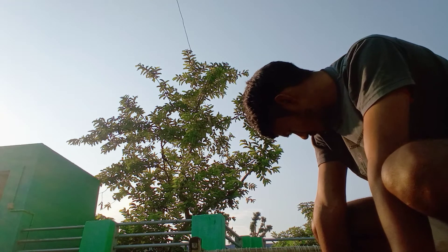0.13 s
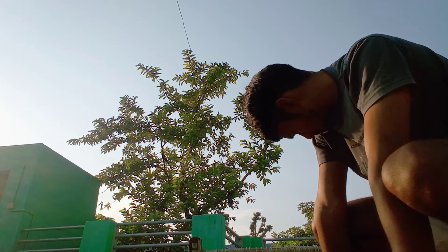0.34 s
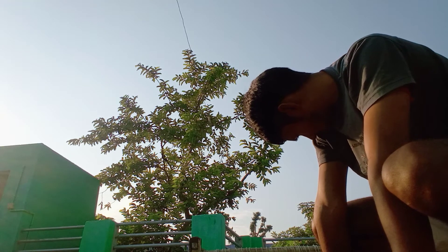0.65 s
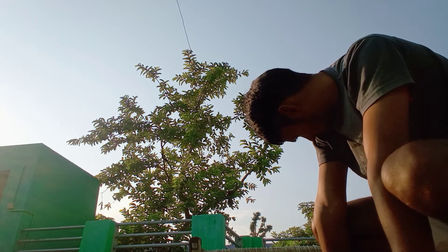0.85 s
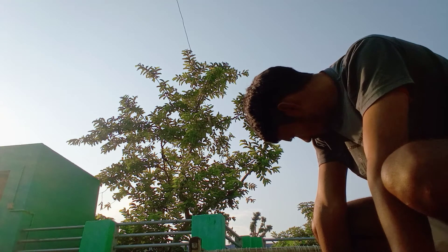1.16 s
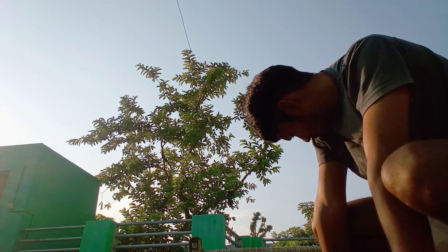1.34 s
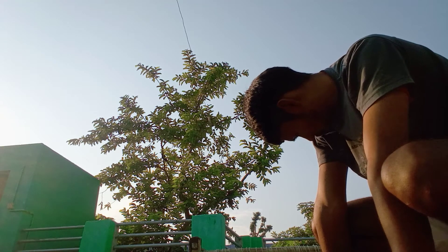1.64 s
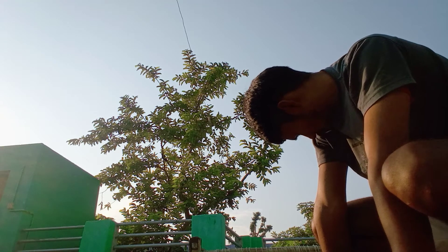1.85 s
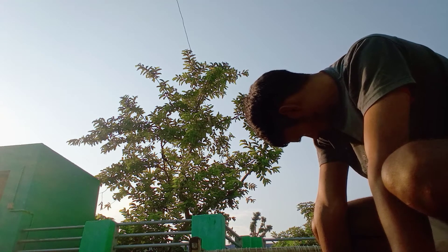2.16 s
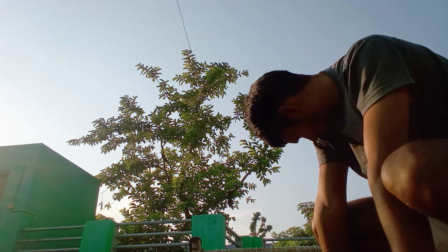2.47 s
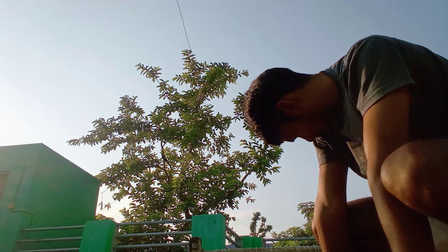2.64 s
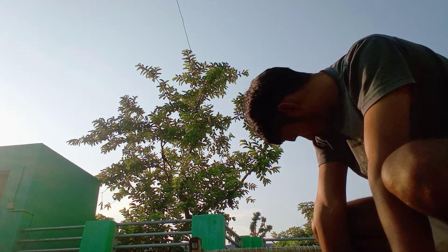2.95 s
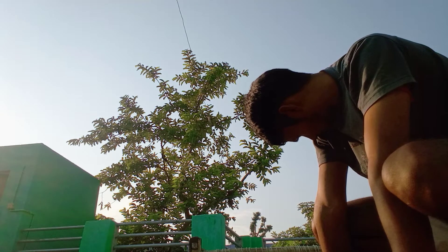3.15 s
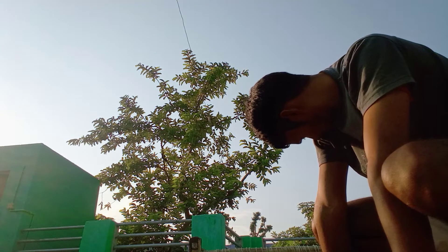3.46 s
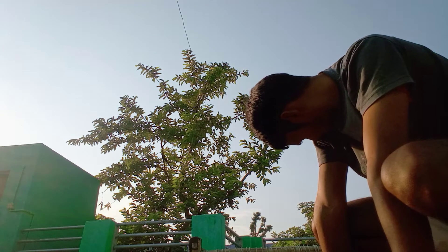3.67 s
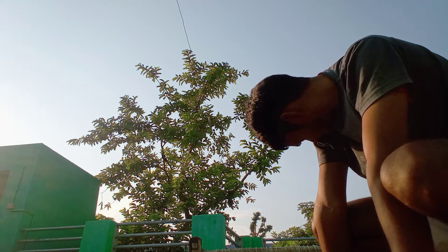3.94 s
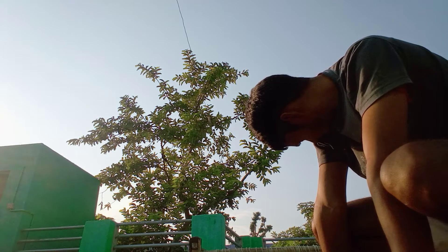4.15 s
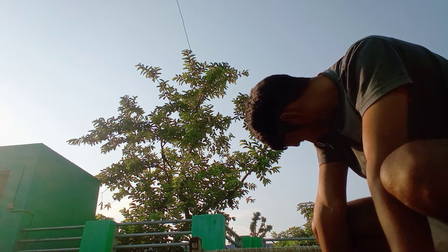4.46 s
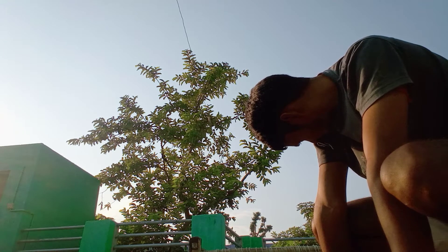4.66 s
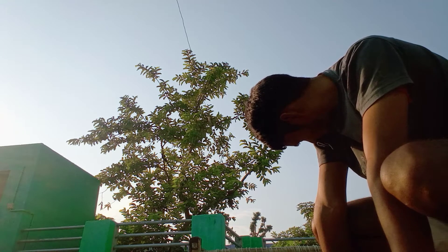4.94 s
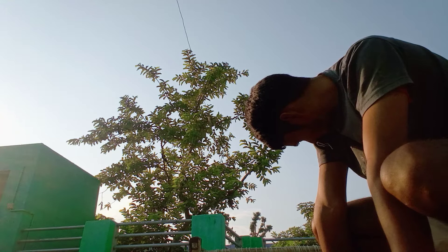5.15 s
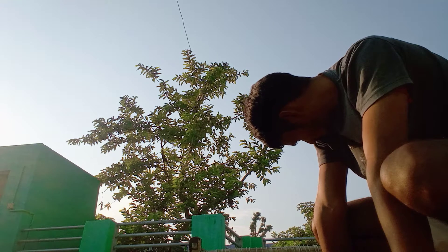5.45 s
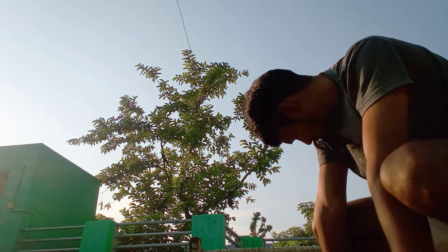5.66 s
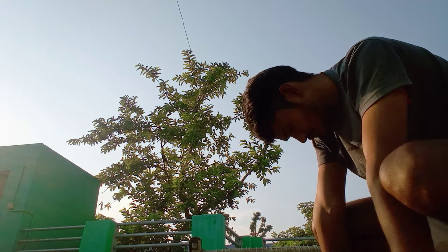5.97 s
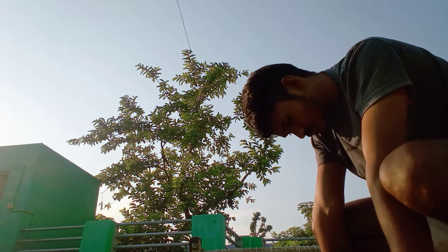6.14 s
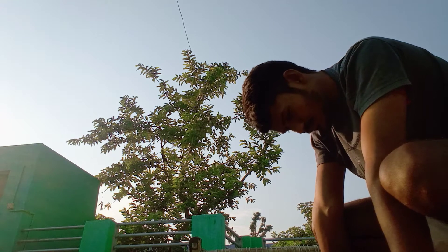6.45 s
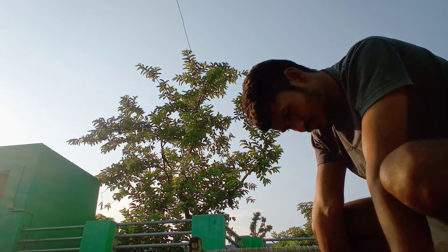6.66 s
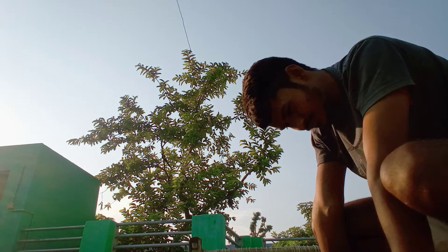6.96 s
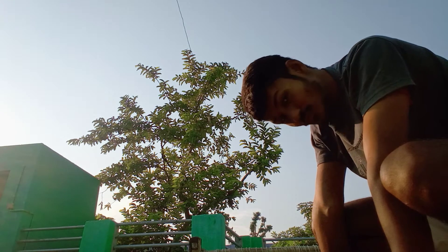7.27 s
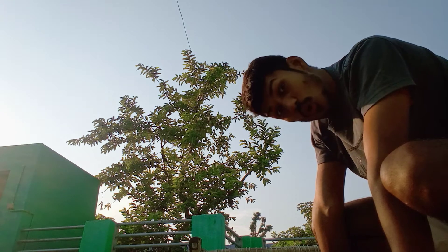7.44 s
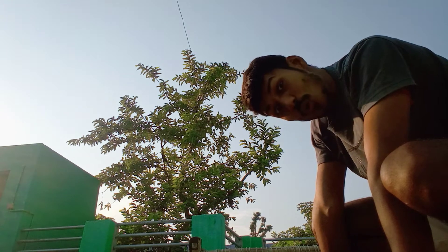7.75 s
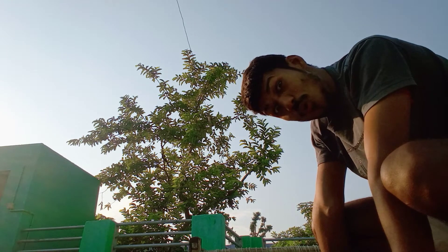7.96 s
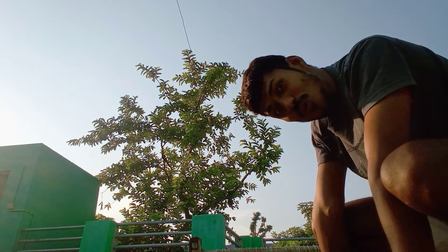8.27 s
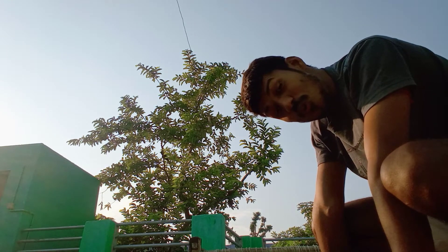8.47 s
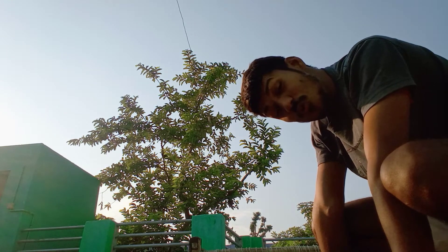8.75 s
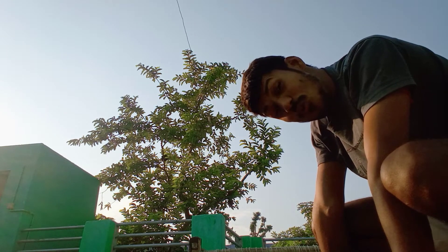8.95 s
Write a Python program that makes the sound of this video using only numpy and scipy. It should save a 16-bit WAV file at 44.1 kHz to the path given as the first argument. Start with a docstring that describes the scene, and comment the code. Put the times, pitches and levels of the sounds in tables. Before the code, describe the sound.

A nearby bird, a koel, calls in short runs of clear, loud whistles, each note higher than the last. Four runs sound across an open rooftop, ringing lightly off the walls and surrounding houses. In the gaps, faint chirps of distant small birds and a low rumble of town come through. A short, soft rustle of clothing close to the microphone follows the final call.

```python
"""On a roof terrace, a koel is heard from a nearby tree, in bursts of whistled notes that climb in pitch.
Its syrinx gives a nearly pure tone, with weak overtones filtered by throat and beak. Wall echoes
interfere with each note so that it beats as it glides, and the neighbourhood reverberates after it.
Small birds chatter and an insect trills far off over a faint town rumble; a hollow noise swells once.
Cloth rustles near the microphone, mostly at the end."""
import sys
import numpy as np
from scipy import signal
from scipy.fft import rfft, irfft, next_fast_len
from scipy.io import wavfile
from scipy.ndimage import uniform_filter1d

SR = 44100
rng = np.random.default_rng(int(sys.argv[2]) if len(sys.argv) > 2 else 0)


def persist_wave(psi):
    """Save psi, clipped to +-1, as 16-bit WAV."""
    counts = np.round(np.clip(psi, -1, 1) * 32767).astype(np.int16)
    wavfile.write(sys.argv[1], SR, np.atleast_2d(counts).T)


N = 401751
TIME = np.arange(N) / SR

# distant town rumble, plus a separate faint hiss near 8 kHz (frequency [Hz], relative density [dB])
BACKGROUND_SPECTRUM = [(25, -38.5), (45, -27), (62, -15), (86, -2), (125, -9.5), (165, -7.5), (205, -12.5),
                       (800, -22), (1200, -26), (3400, -30.5), (6600, -56.5), (8300, -49), (10500, -71),
                       (15500, -65.5)]
# slow course of the background (time [s], level [dB])
BACKGROUND_LEVELS = [(0, -51.5), (1.9, -51), (2.7, -52.5), (3.7, -51), (5.6, -51), (7.4, -52), (8.8, -54)]
# hollow distant noise (frequency [Hz], relative density [dB])
SWELL_SPECTRUM = [(150, -26), (400, -10), (520, 10), (620, -8), (760, 6), (1100, -18.5), (2200, -5),
                  (3200, -12.5), (4500, -63)]

# a far bird's thin falling whistles (time [s], relative level [dB])
FAR_WHISTLES = [(0.549, -68), (2.369, -54.5), (5.651, -55.5), (8.269, -52.5)]
WHISTLE_S, WHISTLE_HZ, WHISTLE_WIDTH_HZ = .17, (4300, 4100, 3860), 46
# slurs that climb at one speed to one pitch (time [s], length [s], relative level [dB])
FAR_SLURS = [(0.524, 0.16, -52), (0.924, 0.077, -59.5), (1.477, .29, -58.5), (2.31, .25, -57.5)]
SLUR_TOP_HZ, SLUR_HZ_PER_S, SLUR_WIDTH_HZ = 2540, 3100, 170
# scolding calls, an arched chip and then a drop (time [s], relative level [dB])
FAR_SCOLDS = [(2.165, -54.5), (4.982, -58.5), (5.38, -64), (6.32, -53)]
CHIP_S, CHIP_HZ, CHIP_WIDTH_HZ = .07, (3950, 4350, 3950), 700
DROP_AFTER_S, DROP_S, DROP_HZ, DROP_WIDTH_HZ, DROP_DB = 0.055, 0.16, (3580, 2540, 2207), 690, -3.5
# far pips and squawks, and one thin, high insect trill
# (time [s], length [s], pitch [Hz], bandwidth [Hz], relative level [dB])
FAR_STEADY_CALLS = [(0.672, 0.42, 4300, 600, -69), (0.968, 0.18, 3570, 400, -54),
                    (1.134, 0.157, 3110, 200, -58.5), (1.283, 0.31, 2990, 800, -57.5),
                    (1.723, 0.26, 3245, 1300, -53.5), (1.642, 0.17, 8300, 220, -73.5),
                    (2.572, 0.19, 2480, 200, -62), (3.079, .11, 2805, 130, -57.5),
                    (3.622, 0.13, 2750, 900, -53.5), (4.55, 0.53, 3260, 150, -67),
                    (6.867, 0.27, 741, 89.7, -60.5), (7.156, 0.059, 2520, 90, -57)]

# strokes of cloth (peak time [s], rise [s], fall [s], level [dB])
CLOTH_STROKES = [(5.60, 0.018, 0.11, -53), (8.692, 0.12, 0.062, -54.5), (8.814, 0.012, 0.022, -43),
                 (8.846, 0.009, 0.011, -34), (8.884, 0.0092, 0.056, -47.5), (8.98, 0.0026, 0.057, -45)]
# friction noise of cloth (frequency [Hz], relative density [dB])
CLOTH_SPECTRUM = [(120, -31.5), (250, -12), (470, -3), (640, -14.5), (850, -10.5), (1500, -15),
                  (1800, -15.5), (3200, -12), (6000, -33.5), (8200, -31.5), (11600, -43), (15500, -36.5)]

# reflections from the walls, parapets and floor of the terrace (delay [ms], gain [ratio])
REFLECTIONS = [(2.299, 0.158), (3.996, 0.234), (5.77, 0.352), (8.405, 1.35), (8.803, 0.27), (8.959, 0.904),
               (8.969, 0.201), (9.403, 0.326), (13.552, 0.345), (14.872, 0.147), (30.688, 0.194),
               (59.403, 0.216)]
# rough walls scatter the treble away (frequency [Hz], gain [dB])
WALL_RESPONSE = [(1700, -0.5), (2800, -7), (5000, -15), (15000, -17.5)]
# sound scattered by foliage (frequency [Hz], gain [dB])
LEAF_RESPONSE = [(1600, -30), (2400, -6), (6000, -2), (9000, 3)]
# reverberation of the neighbourhood (frequency [Hz], time to decay by 60 dB [s])
REVERB_TIMES = [(800, 0.7), (1400, 0.77), (3000, 0.15), (7000, 0.55), (14000, 0.087)]
# colour of the koel's reverberation (frequency [Hz], gain [dB])
REVERB_RESPONSE = [(1400, 2), (3000, 5.5), (7000, 5), (10000, 7), (14000, 3.0)]

# koel notes (crest time [s], dip pitch [Hz], crest pitch [Hz], fall length [s],
# relative lead-in level [dB], relative crest level [dB])
KOEL_NOTES = [(-0.047, 1085, 1315, .078, -27, -14.5), (0.1932, 1211, 1398, .075, -18, -12),
              (0.4386, 1262, 1438, .073, -13.5, -12), (3.6694, 788, 1186, .049, -43.5, -18.5),
              (3.8972, 1044, 1311, .06, -23, -14.5), (4.1389, 1172, 1374, .069, -18, -14),
              (5.8384, 794.6, 1239, .051, -36, -16.5), (6.0627, 1060, 1340, .063, -22.5, -12),
              (6.2946, 1204, 1401, .071, -14.5, -11.5), (6.54, 1261, 1441, .074, -14.5, -9.5),
              (6.7872, 1304, 1477, .066, -13, -10), (7.6969, 999, 1360, .058, -25, -12.5),
              (7.935, 1235, 1464, .077, -17, -10), (8.189, 1317, 1504, .074, -17, -14.5)]
# a note's turning points, from its crest (start [s], hump [s], dip [s], shoulder [s], shoulder [s])
TURNING_TIMES = (-.1101, -.0766, -.0469, -.0089, .019)
# shoulder pitch as a share of the crest's height (above the dip [ratio], above the end [ratio])
SHOULDER_HEIGHTS = (.941, .809)
# harmonics 2 to 12 at the syrinx (relative level [dB])
SYRINX_HARMONICS = [-38, -35.5, -36.5, -32, -43.5, -49, -52.5, -60.5, -61.5, -59, -59]
# resonances of throat and beak (frequency [Hz], gain [dB])
TRACT_RESPONSE = [(1700, 6.5), (2080, -4), (2380, -2), (2580, -9.5), (2830, 5), (3300, -0.5), (3800, -6.5),
                  (4250, -12.5), (4650, -15), (5450, 0.5), (6300, -5), (7300, -5), (11000, 2.5),
                  (12400, -14), (14000, 7.5)]
# breath noise (frequency [Hz], relative density [dB])
BREATH_SPECTRUM = [(900, -8.0), (2200, 0), (4500, -7), (6000, 5), (9000, -15), (15000, -6.5)]
# rasps as the voice catches at the start of a burst (time [s], bandwidth [Hz], relative level [dB])
BURST_RASPS = [(3.545, 447, -46), (5.715, 400, -45.5), (7.591, 91, -36.5)]
RASP_S, RASP_HZ = 0.15, (1018, 1077.5, 1150)


def from_db(db):
    """Amplitude ratio: tenfold for every 20 dB."""
    return 10 ** (np.asarray(db) / 20)


def unit(x):
    """Normalisation to an rms of 1."""
    return x / np.sqrt(np.mean(x ** 2) + 1e-20)


def value_at(points, hz):
    """Interpolation on a logarithmic frequency axis."""
    f, value = np.transpose(points)
    return np.interp(np.log(hz + 1), np.log(f + 1), value)


def colour(x, points):
    """Linear filtering: multiplies the spectrum by a response (frequency [Hz], gain [dB])."""
    size = next_fast_len(len(x) + 4096)
    response = from_db(value_at(points, np.fft.rfftfreq(size, 1 / SR)))
    return irfft(rfft(x, size) * response, size)[:len(x)]


def drift(count, hz):
    """Low-pass noise: a random wavering of rms near 1, up to about hz."""
    size = next_fast_len(count + SR // 4)
    f = np.fft.rfftfreq(size, 1 / SR)
    spectrum = rfft(rng.standard_normal(size)) / np.sqrt(1 + (f / hz) ** 6)
    return unit(irfft(spectrum, size))[:count]


def add(mix, s, sound):
    """Superposition of a sound on the mix at time s."""
    at = round(s * SR)
    sound = sound[max(-at, 0):]
    part = mix[max(at, 0):][:len(sound)]
    part += sound[:len(part)]


def glide(t, times, values):
    """Monotone cubic interpolation: a smooth curve that never overshoots its points."""
    times, values = np.array(times), np.array(values, float)
    gap = np.diff(times)
    slope = np.diff(values) / gap
    a, b = 2 * gap[1:] + gap[:-1], gap[1:] + 2 * gap[:-1]
    inner = (a + b) * np.maximum(slope[:-1] * slope[1:], 0) / (a * slope[1:] + b * slope[:-1] + 1e-9)
    tangent = np.r_[2 * slope[0], inner, 0]
    i = np.clip(np.searchsorted(times, t) - 1, 0, len(gap) - 1)
    u = np.clip((t - times[i]) / gap[i], 0, 1)
    bend = (1 - u) * (tangent[i] - slope[i]) - u * (tangent[i + 1] - slope[i])
    return values[i] + gap[i] * u * (slope[i] + (1 - u) * bend)


def background(drone_hz=83, drone_width_hz=16, drone_db=-7, surge_db=1.66, surge_hz=6):
    """Amplitude modulation: the town's rumble and low drone surge, while a faint hiss stays steady."""
    wash = unit(colour(rng.standard_normal(N), BACKGROUND_SPECTRUM))
    waver = drift(N, drone_width_hz / 2) + 1j * drift(N, drone_width_hz / 2)
    drone = from_db(drone_db) * unit((waver * np.exp(2j * np.pi * drone_hz * TIME)).real)
    rumble = colour(wash, [(600, 0), (2400, -20)])
    hiss = wash - rumble
    surge = from_db(surge_db * drift(N, surge_hz))
    return from_db(np.interp(TIME, *np.transpose(BACKGROUND_LEVELS))) * (hiss + surge * (rumble + drone))


def far_swell(peak_s=4.68, width_s=.35, level_db=-54.0):
    """Spectral peaks make a noise sound hollow; it swells once under a Gaussian envelope."""
    noise = unit(colour(rng.standard_normal(N), SWELL_SPECTRUM))
    return from_db(level_db) * np.exp(-((TIME - peak_s) / width_s) ** 2) * noise


def neighbourhood(x, build_s=0.042, near_db=5, near_t60=0.095):
    """Reverberation among houses and trees: a quick near part, then a tail whose treble dies first."""
    count = SR * 3 // 2
    taps = rng.standard_normal(count) * (rng.random(count) < .1)
    hz, t, spectra = signal.stft(taps, SR, nperseg=256)
    decay = from_db(-60 * t / value_at(REVERB_TIMES, hz)[:, None])
    near_boost = 1 + from_db(near_db - 60 * t / near_t60)
    tail = signal.istft(spectra * decay * near_boost, SR, nperseg=256)[1][:count]
    tail *= 1 - np.exp(-(np.arange(count) / SR / build_s) ** 2)
    return signal.fftconvolve(x, tail / np.linalg.norm(tail))[:len(x)]


def rough_calls(rows):
    """Random modulation broadens a gliding tone: nearly pure in a narrow band, a squawk in a wide one."""
    calls = np.zeros(N)
    for s, length, start_hz, middle_hz, end_hz, width_hz, db in rows:
        count = int(length * SR)
        parabola = np.polyfit([-1, 0, 1], [start_hz, middle_hz, end_hz], 2)
        hz = np.polyval(parabola, np.linspace(-1, 1, count))
        flutter = 60 / width_hz + drift(count, width_hz / 2) + 1j * drift(count, width_hz / 2)
        call = (flutter * np.exp(2j * np.pi * np.cumsum(hz) / SR)).real
        add(calls, s, from_db(db) * unit(call * signal.windows.tukey(count, .4)))
    return calls


def twitter(count=45, level_db=-68, spread_db=4, width_hz=380):
    """Short frequency sweeps at random times and pitches: the chirps of the farthest birds."""
    when, length, pitch, slide, loud = rng.random((count, 5)).T
    hz = 2000 + 2300 * pitch
    sweep = 0.13 * (2 * slide - 1)
    columns = [when * N / SR, 0.031 + 0.073 * length, hz * (1 - sweep), hz, hz * (1 + sweep),
               np.full(count, width_hz), level_db + spread_db * (2 * loud - 1)]
    return rough_calls(np.transpose(columns))


def far_wildlife(direct_db=-1.0, reverb_db=-5):
    """Far birds and an insect are blurred, as the reverberant field nears the direct sound in level."""
    whistles = [(s, WHISTLE_S, *WHISTLE_HZ, WHISTLE_WIDTH_HZ, db) for s, db in FAR_WHISTLES]
    climb_left = np.array([1, .5, 0])
    slurs = [(s, length, *(SLUR_TOP_HZ - SLUR_HZ_PER_S * length * climb_left), SLUR_WIDTH_HZ, db)
             for s, length, db in FAR_SLURS]
    chips = [(s, CHIP_S, *CHIP_HZ, CHIP_WIDTH_HZ, db) for s, db in FAR_SCOLDS]
    drops = [(s + DROP_AFTER_S, DROP_S, *DROP_HZ, DROP_WIDTH_HZ, db + DROP_DB) for s, db in FAR_SCOLDS]
    steady = [(s, length, hz, hz, hz, width_hz, db) for s, length, hz, width_hz, db in FAR_STEADY_CALLS]
    calls = rough_calls(whistles + slurs + chips + drops + steady) + twitter()
    return from_db(direct_db) * calls + from_db(reverb_db) * neighbourhood(calls)


def cloth(grain_db=1.0, grain_hz=400):
    """Friction noise: grainy strokes of cloth that rise and fall exponentially."""
    strokes = sum(from_db(db) * np.exp(-np.maximum((s - TIME) / rise, (TIME - s) / fall))
                  for s, rise, fall, db in CLOTH_STROKES)
    grains = rng.standard_normal(N) * from_db(grain_db * drift(N, grain_hz))
    return strokes * unit(colour(grains, CLOTH_SPECTRUM))


def terrace(x, leaves_db=-4, leaves_t60=0.13):
    """Interference: wall echoes beat with each direct glide, while foliage scatters the overtones."""
    t = np.arange(len(x)) / SR
    echoes = sum(gain * np.interp(t - ms / 1000, t, x, left=0) for ms, gain in REFLECTIONS)
    count = SR // 10
    leaves = rng.standard_normal(count) * from_db(-60 * t[:count] / leaves_t60)
    scattered = signal.fftconvolve(x, leaves / np.linalg.norm(leaves))[:len(x)]
    return x + colour(echoes, WALL_RESPONSE) + from_db(leaves_db) * colour(scattered, LEAF_RESPONSE)


def note_shape(dip_hz, slack_hz=790, taut_hz=1300, caught_effort=0.54, scoop_hz=242.4, linger_s=0.043):
    """Tension sets pitch: effort, 0 for a slack syrinx and 1 for a taut one, shapes the note."""
    effort = (dip_hz - slack_hz) / (taut_hz - slack_hz)
    caught = np.clip(effort / caught_effort, 0, 1)  # at 1 the voice speaks cleanly
    start_hz = max(dip_hz - scoop_hz * (1 - effort), slack_hz)
    hump_hz = dip_hz * 1.069 ** caught
    end_hz = max(dip_hz * .848, slack_hz)
    hold_s = linger_s * (1 - caught)  # a slack note lingers on its lowest pitch
    return start_hz, hump_hz, end_hz, hold_s


def koel_note(row, jitter=0.0014, jitter_hz=160, flutter_db=4.5, breath_db=-50, rasp_db=-28.5,
              rasp_growth=1.1, overtone_growth=0.67, bright_db=1.07, bright_growth=0.15, dull_db=3):
    """Source and filter: the syrinx glides through hump, dip and crest; the tract colours overtones."""
    crest_s, dip_hz, crest_hz, fall, lead_db, crest_db = row
    start_hz, hump_hz, end_hz, hold = note_shape(dip_hz)
    start, hump, dip, before, after = TURNING_TIMES
    t = np.arange(-.125, .11, 1 / SR)
    feet_hz = np.array([dip_hz, end_hz])
    before_hz, after_hz = feet_hz + np.array(SHOULDER_HEIGHTS) * (crest_hz - feet_hz)
    times = [start - .004, hump, dip, before, 0, after, fall, .12]
    hz = glide(t, times, [start_hz, hump_hz, dip_hz, before_hz, crest_hz, after_hz, end_hz, end_hz])
    phase = 2 * np.pi * np.cumsum(hz * (1 + jitter * drift(len(t), jitter_hz))) / SR

    attack = [(start - .015, -110), (start - .008, lead_db - 30), (start + .008, lead_db), (dip, lead_db)]
    crest = [(before, crest_db), (after, crest_db), (fall - .015, crest_db - 7.6)]
    release = [(fall, crest_db - 23), (fall + hold, crest_db - 23), (fall + hold + .015, -110)]
    level_db = np.interp(t, *np.transpose(attack + crest + release))
    whistle = from_db(level_db) * np.sin(phase)

    overtones = np.zeros(len(t))
    for k, db in enumerate(SYRINX_HARMONICS, 2):
        flutter = flutter_db * drift(len(t), hz=87)
        overtones += from_db(db + value_at(TRACT_RESPONSE, k * hz) + flutter) * np.sin(k * phase)
    # a puff of breath and a rasp as the syrinx starts
    onset = np.exp(-((t - start) / .007) ** 2)
    air = unit(colour(rng.standard_normal(len(t)), BREATH_SPECTRUM))
    breath = from_db(breath_db) * air * (1 + 5 * onset)
    rasp = from_db(rasp_db + rasp_growth * lead_db) * onset * drift(len(t), hz=650) * np.sin(1.8 * phase)

    # overtones grow less steeply than the whistle; they dull in the fall and with a weak lead-in
    buzz_db = bright_db + crest_db + overtone_growth * (level_db - crest_db)
    dulling_db = dull_db * np.clip(t / fall, 0, 1) ** 2 - bright_growth * lead_db
    buzz = from_db(buzz_db - dulling_db) * (overtones + breath)
    return crest_s + t[0], whistle + buzz + rasp


def koel(near_db=4, reverb_db=-17):
    """Multipath propagation: the voice arrives directly, as terrace echoes and as reverberation."""
    head_start = SR // 4  # the bird is already calling
    rasps = rough_calls([(s, RASP_S, *RASP_HZ, width_hz, db) for s, width_hz, db in BURST_RASPS])
    voice = np.r_[np.zeros(head_start), rasps]
    for row in KOEL_NOTES:
        s, note = koel_note(row)
        add(voice, s + head_start / SR, note)
    reverb = colour(neighbourhood(voice), REVERB_RESPONSE)
    return (from_db(near_db) * terrace(voice) + from_db(reverb_db) * reverb)[head_start:]


def scene():
    """Superposition: the pressures of all sources add at one microphone."""
    return (koel() + far_wildlife() + cloth() + background() + far_swell())[None]


def record(dry, threshold_db=-8.5, ratio=1.9, recover_db_per_s=14, cutoff_hz=15700):
    """Compression holds down the loudest notes and the background with them; a low-pass follows."""
    power_db = 10 * np.log10(abs(uniform_filter1d(dry[0] ** 2, size=256)) + 1e-12)
    recovery = recover_db_per_s * TIME
    held_db = np.maximum.accumulate(power_db + recovery) - recovery
    over_db = np.maximum(held_db - threshold_db, 0)
    compressed = dry / from_db((1 - 1 / ratio) * uniform_filter1d(over_db, size=512))
    fade_in = np.sin(np.pi / 2 * np.minimum(TIME / .008, 1)) ** 2
    low_pass = signal.firwin(511, cutoff_hz, window=("kaiser", 9), fs=SR)
    return signal.oaconvolve(compressed * fade_in, low_pass[None], "same")


dry = scene()
out = record(dry)
persist_wave(out)
```